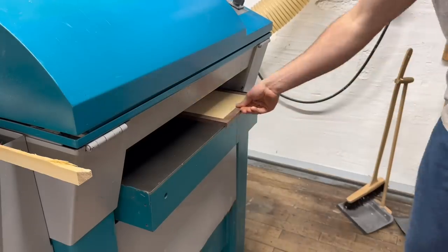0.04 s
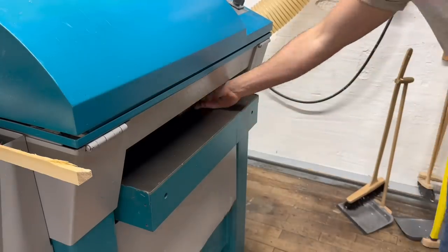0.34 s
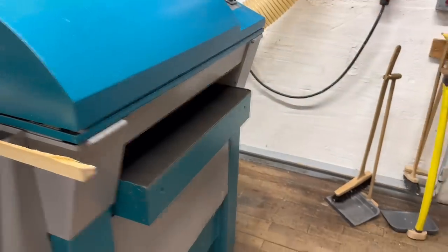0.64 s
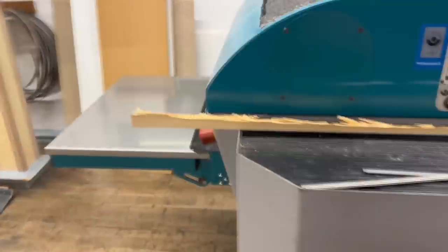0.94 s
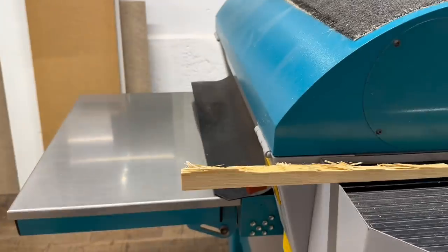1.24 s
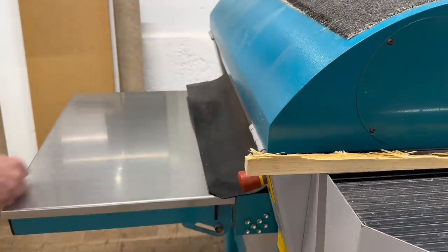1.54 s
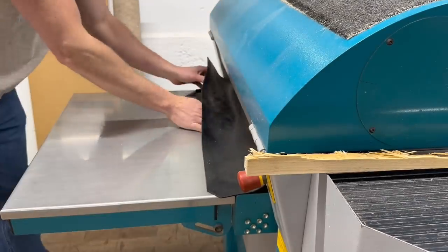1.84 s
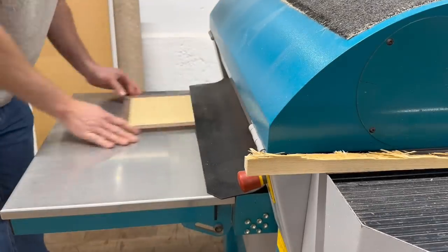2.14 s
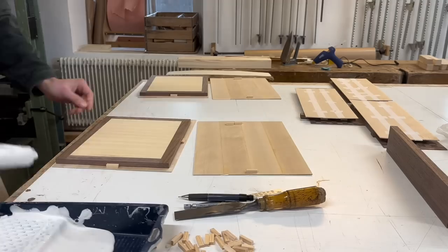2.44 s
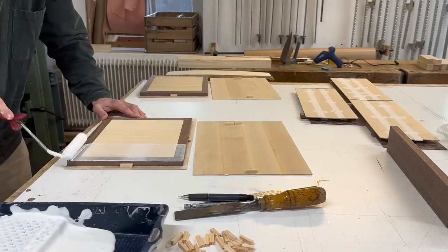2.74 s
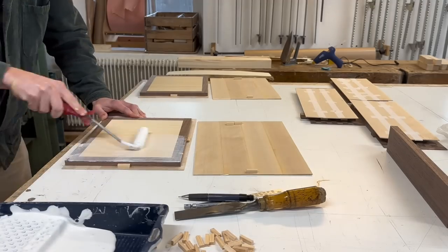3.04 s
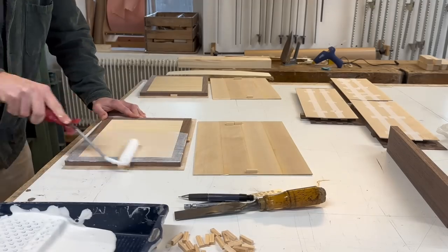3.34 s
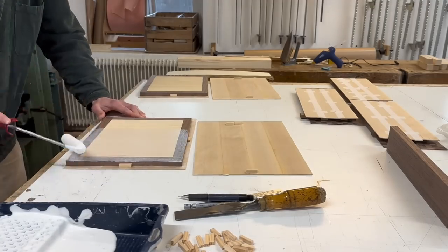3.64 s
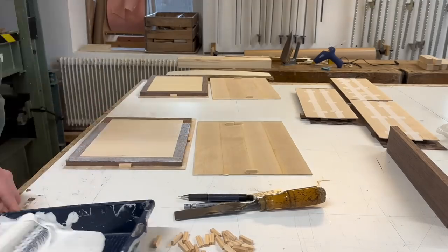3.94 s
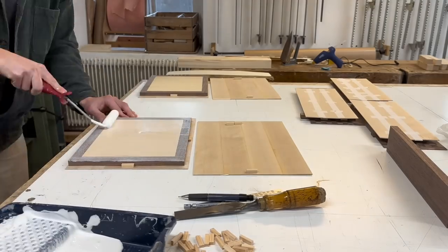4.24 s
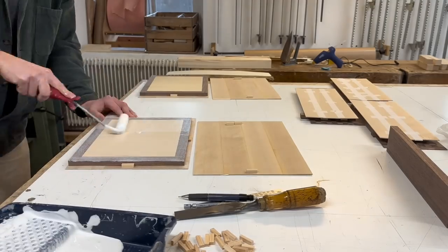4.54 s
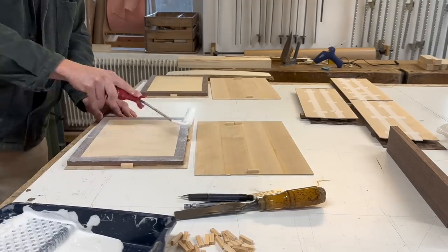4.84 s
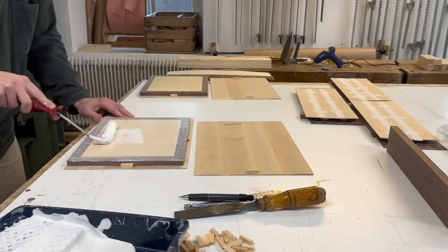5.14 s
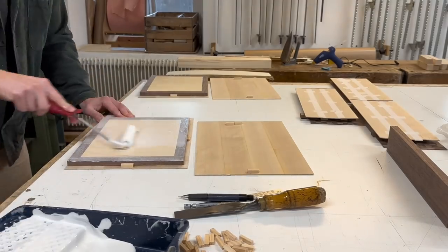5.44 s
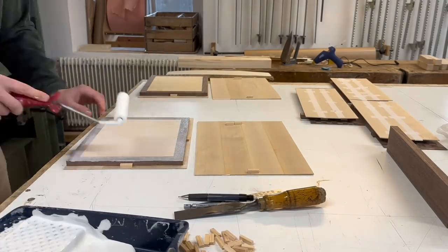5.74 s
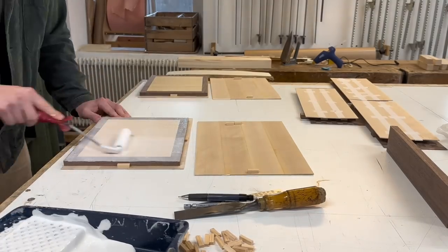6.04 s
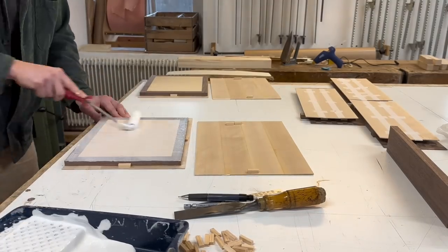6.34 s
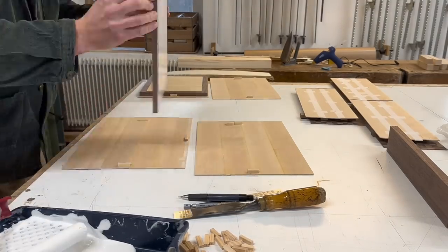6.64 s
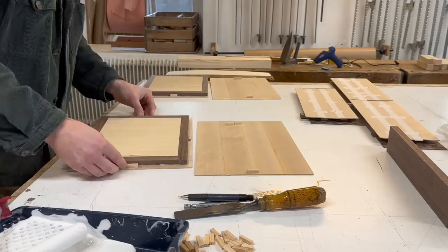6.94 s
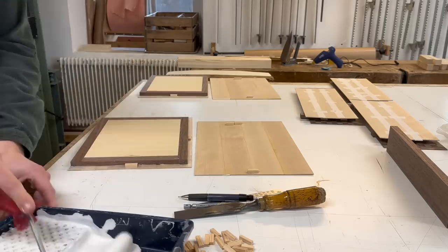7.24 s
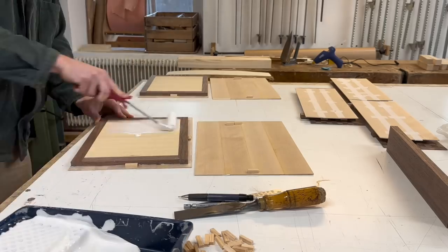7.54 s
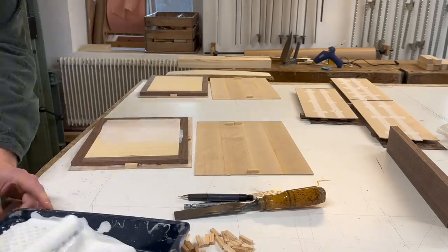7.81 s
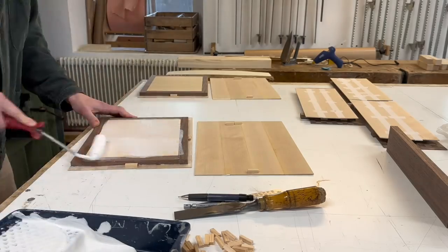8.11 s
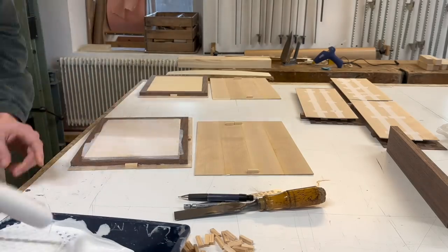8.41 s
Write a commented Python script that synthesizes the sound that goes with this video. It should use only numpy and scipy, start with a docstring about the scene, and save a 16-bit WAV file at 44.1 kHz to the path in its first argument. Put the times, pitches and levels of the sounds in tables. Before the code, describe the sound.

A loud planer whines over rushing air, then gives way to clicks, knocks and tacky roller strokes in a quiet workshop.

```python
"""A thickness planer whines over its roar of air and at once bites into a board, the knives adding a shrill,
stuttering ladder of partials. The board leaves, a few dull thuds sound like footsteps, and the planer's sound
breaks off abruptly. Quick bench work follows in a quiet shop, with faint chirps: a wooden frame clicks and
knocks on the table as a tacky glue roller makes one long pass, crackling with snapping threads. The roller
ticks over five ribs of its plastic tray, clacks, and goes on over the frame in short strokes."""
import sys
import numpy as np
from scipy import signal
from scipy.fft import rfft, irfft, next_fast_len
from scipy.io import wavfile
from scipy.ndimage import uniform_filter1d, map_coordinates

SR = 44100
rng = np.random.default_rng(int(sys.argv[2]) if len(sys.argv) > 2 else 0)


def waveform_to_disk(signal):
    """Save audio, clipped to [-1, 1], as 16-bit WAV at the path in sys.argv[1]."""
    frames = np.transpose(np.atleast_2d(signal))
    scaled = np.clip(frames, -1, 1) * 32767
    samples = np.round(scaled).astype(np.int16)
    wavfile.write(sys.argv[1], SR, samples)


N = 373527
TIME = np.arange(N) / SR
AGE = TIME[:SR // 5]   # seconds since a contact

# room tone of the shop: (frequency [Hz], relative density [dB])
SHOP_SPECTRUM = [(30, -62), (100, -42.5), (200, -27.5), (320, -23), (385, -6), (750, -4.5), (1100, -12),
                 (2650, -12), (3100, -18.5), (3500, -15), (7500, -23.5), (10200, -25.5), (16000, -33.5)]
# broad resonances of the shop: (frequency [Hz], width [Hz], boost [dB])
SHOP_RESONANCES = [(1250, 150, 3), (5620, 260, 3.5)]
# faint ventilation tones: (pitch [Hz], level [dB])
VENT_TONES = [(387.6, -68), (818, -71), (983, -70), (3330, -74), (3430, -69.5), (9981, -76)]
# stereo width at the bench: (frequency [Hz], side minus mid [dB])
BENCH_WIDTH = [(60, -5), (130, -12), (290, -27), (640, -23), (1410, -16.5), (3100, -4.5), (6820, 0.5),
               (15000, 1)]
# faint, short gliding chirps: (time [s], level [dB], pitch [Hz])
FAINT_CHIRPS = [(3.14, -61, 4550), (3.28, -59.5, 1710), (4.305, -63, 2210), (4.462, -51.5, 1560),
                (4.55, -56, 1600), (4.904, -63, 2640), (4.96, -64, 4550), (7.565, -56, 1275),
                (8.07, -62, 4950)]
# hollow rubbing of the wood: (time [s], level [dB])
RUB_LEVEL = [(2.55, -85), (2.63, -60), (2.9, -64), (3.15, -60), (3.28, -54), (3.33, -80)]
# modes of the frame on the table: (frequency [Hz], width [Hz], gain [dB])
FRAME_MODES = [(607, 80, 0.5), (860, 190, -5.5), (1235, 71, 2), (1594, 140, -0.5), (2567, 98, -7),
               (2800, 54, -2.5), (3560, 93, -12), (3890, 60, -6)]
# hard clicks of tool and frame: (time [s], level [dB], hardness [dB])
FRAME_CLICKS = [(2.301, -30, 10.5), (2.312, -34.5, 2), (2.3235, -27, 6.5), (2.33, -38, 11),
                (2.489, -40.5, 2), (4.474, -46, 3), (4.485, -33, 6), (5.911, -35.5, 8.5), (5.943, -39, 0.5),
                (6.244, -36, 0.5), (6.722, -31.5, -2.5), (6.8073, -31.5, -2.5), (7.853, -27.5, 7)]
# soft knocks of wood on the table: (time [s], level [dB], ring [Hz], relative snap [dB])
TABLE_KNOCKS = [(2.361, -34.5, 694, -12), (2.555, -38, 970, -11), (2.619, -37.5, 1160, -10),
                (3.108, -39, 1210, -11), (3.272, -43, 550, -9), (3.286, -44.5, 1500, -4),
                (4.4276, -35, 826, -18), (4.433, -35, 1000, -21), (4.661, -36.5, 980, -17),
                (4.724, -37, 1200, -13), (5.337, -41, 1180, -16), (5.398, -36.5, 1100, -13.5),
                (5.714, -37.5, 1140, -8), (6.827, -40, 1900, -13), (7.124, -38.5, 1160, -12),
                (7.173, -41, 730, -14), (7.649, -31, 646, -16), (7.76, -31, 680, -14.5),
                (7.81, -40, 1180, -7), (7.856, -31.5, 1510, -17), (7.967, -38, 720, -14)]
# modes of the plastic tray: (frequency [Hz], width [Hz], gain [dB])
TRAY_MODES = [(1240, 1600, -2), (3120, 1900, -3), (4160, 500, 5.5), (7160, 7500, -4), (12800, 19000, -19)]
# the tick on the tray's fifth rib, then clacks: (time [s], level [dB], ring [Hz])
TRAY_CLACKS = [(4.0142, -24, 4800), (4.019, -26.5, 3400), (4.139, -31, 4200), (4.1412, -18.5, 2550)]
# peeling glue: (frequency [Hz], relative density [dB])
CRACKLE_SPECTRUM = [(1300, -40), (2200, -9), (2750, -2.5), (3200, -3.5), (4300, -2), (8500, -5),
                    (14800, -8), (16000, -5.5)]
# travel of the roller in its long pass: (time [s], travel [turns])
PASS_TRAVEL = [(2.538, 0), (2.963, 19), (3.043, 22), (3.132, 26)]
# short strokes and one-turn dabs: (first turn [s], last turn [s], level [dB], relative crackle [dB])
ROLLER_STROKES = [(2.377, 2.443, -49, -4.5), (3.268, 3.268, -46.5, -0.5), (3.629, 3.629, -42, -7),
                  (4.091, 4.091, -48, 3), (4.564, 4.587, -48, -2.5), (5.577, 5.578, -44, -10),
                  (5.846, 5.846, -45.5, -4), (6.001, 6.039, -47, -3.5), (6.14, 6.209, -38.5, -8.5),
                  (6.273, 6.273, -41.5, -21), (6.766, 6.766, -47.5, -1), (6.841, 6.911, -38, -6.5),
                  (6.943, 7.004, -37.5, -6), (7.041, 7.072, -35.5, -5.5), (7.116, 7.137, -43, -5.5),
                  (7.595, 7.595, -40.5, -15), (7.692, 7.693, -44.5, -5.5), (7.791, 7.792, -37.5, -8.5),
                  (7.884, 7.952, -39, -9.5), (8.301, 8.301, -40.5, -7), (8.338, 8.378, -36, -8.5)]
# dull, low thuds, like footsteps or handling bumps: (time [s], level [dB], ring [Hz])
DULL_THUDS = [(0.966, -34.5, 533), (1.034, -30.5, 874), (1.063, -31, 560), (1.084, -33.5, 520),
              (1.113, -30, 530), (1.143, -33, 476)]
# resonances of the planer's hood: (frequency [Hz], width [Hz], gain [dB])
HOOD_MODES = [(509.5, 88, 8), (681, 24, 11.5), (1045, 99, 7), (1203, 32, 7.5)]
# stereo width of the planer's air: (frequency [Hz], side minus mid [dB])
PLANER_WIDTH = [(60, -13), (130, -42), (290, -21), (640, -20), (1410, -10), (3100, -2.5), (6820, -1.5),
                (15000, -12)]
# air dragged round by the cutter block: (time [s], roar level [dB], hiss level [dB])
AIR_LEVELS = [(0.02, -37.5, -52), (0.4, -40, -52.5), (0.83, -39.5, -57.5), (1.32, -37.5, -54.5),
              (2.13, -37, -52), (2.27, -36, -52.5)]
# low roar of that air: (frequency [Hz], relative density [dB])
ROAR_SPECTRUM = [(30, -69), (85, -50), (150, -28), (230, -15), (340, -11), (440, -7.5), (510, -2.5),
                 (740, -7), (1100, -8.5), (1400, -13), (2600, -18.5), (3100, -23), (4500, -42)]
# its bright hiss: (frequency [Hz], relative density [dB])
HISS_SPECTRUM = [(1180, -33), (2000, -6), (2910, -9), (3550, -9.5), (5210, -7), (13600, -16), (16000, -17)]
# steady tones of drive and extractor: (pitch [Hz], level [dB])
DRIVE_TONES = [(511.4, -61), (1316, -50.5), (2837, -60.5), (2908, -53.5), (13480, -68), (13610, -68)]
# whine of the cutter block: (time [s], pitch [Hz])
WHINE_PITCH = [(0, 1709.3), (0.2, 1708.1), (0.65, 1708.0), (1.15, 1710.2), (2.3, 1710.5)]
# swell and dip of the whine: (time [s], level [dB])
WHINE_LEVEL = [(0.02, -33.5), (0.43, -35), (0.7, -38), (0.775, -57), (0.835, -44), (0.92, -43), (1.17, -38),
               (1.64, -37.5), (1.8, -39), (2.27, -37.5)]
# partials of the cut: (multiple of half the whine pitch, level [dB])
CUT_PARTIALS = [(3, -55), (8, -46), (9, -53.5), (10, -37), (11, -52), (12, -46), (13, -51.5), (14, -43),
                (15, -54.5), (18, -42.5)]
# stutters in the shriek of the cut: (time [s])
SHRIEK_BREAKS = [.205, .346, .42, .487, .508, .562, .643]

ENTER_S, LEAVE_S, STOP_S = 0.11, 0.655, 2.289   # board enters, board leaves, the planer's sound breaks off


def from_db(db):
    """Decibels to gain."""
    return 10 ** (np.asarray(db) / 20)


def rms_one(x):
    """Scale to unit rms."""
    return x / np.sqrt(np.mean(x ** 2) + 1e-20)


def peak_one(x):
    """Scale so that the loudest few milliseconds have unit rms."""
    return x / np.sqrt(uniform_filter1d(np.mean(x ** 2, axis=0), size=200).max() + 1e-20)


def in_time(rows):
    """The columns of an automation curve at every sample."""
    s, *columns = np.transpose(rows)
    return [np.interp(TIME, s, c) for c in columns]


def bump(s, width_s):
    """A bell of height 1 round time s."""
    return np.exp(-((TIME - s) / width_s) ** 2)


def pan(db):
    """Gains of the two ears; positive is left."""
    return from_db(db / 2 * np.array([[1], [-1]]))


def drift(rate):
    """Random modulation of spread 1, changing about rate times a second."""
    knots = rng.standard_normal(4096)
    return map_coordinates(knots, [TIME * rate], order=1, mode="wrap") * np.sqrt(3 / 2)


def colour(x, spectrum, peaks=()):
    """EQ a sound with a smooth curve over log frequency, plus resonance peaks."""
    size = next_fast_len(x.shape[-1])
    hz = np.arange(size // 2 + 1) * SR / size
    curve_hz, curve_db = np.transpose(spectrum)
    db = np.interp(np.log(np.maximum(hz, 1)), np.log(curve_hz), curve_db)
    db += sum(boost / (1 + (2 * (hz - centre) / width) ** 2) for centre, width, boost in peaks)
    return irfft(rfft(x, size) * from_db(db), size)[..., :x.shape[-1]]


def diffuse(width):
    """Stereo noise: a white mid plus a side coloured by the width curve."""
    mid, side = rng.standard_normal((2, N))
    return mid + colour(side, width) * np.array([[1], [-1]])


def band(x, low_hz, high_hz):
    """Gentle band-pass."""
    return signal.sosfilt(signal.butter(2, [low_hz, high_hz], "band", fs=SR, output="sos"), x)


def resonate(x, modes):
    """Parallel resonances with alternating signs."""
    out = 0
    for k, (hz, width, db) in enumerate(modes):
        out = out + (-1) ** k * from_db(db) * signal.lfilter(*signal.iirpeak(hz, hz / width, fs=SR), x)
    return out


def add(track, s, sound):
    """Mix a short sound in at time s."""
    i = int(s * SR)
    track[:, i:i + sound.shape[1]] += sound[:, :N - i]


def tone(cycles, rough, rate, wander_db, apart=0.24):
    """A stereo tone: turbulence frays it, standing waves swell it and shift it between the ears."""
    angle = 2 * np.pi * cycles + apart * np.sqrt(2) * np.tanh(drift(2.5)) * np.array([[1], [-1]])
    frayed = np.sin(angle) * (1 + rough * drift(rate)) + np.cos(angle) * rough * drift(rate)
    return np.sqrt(2 / (1 + 2 * rough ** 2)) * frayed * from_db(wander_db * drift(10))


def contact(scatter, s, t60, direct):
    """A blow: one direct click, then dense reflections that die away."""
    blow = np.roll(scatter, -int(s * SR), axis=1)[:, :len(AGE)] * from_db(-60 * AGE / t60)
    blow[:, 0] += direct
    return blow


def frame_at_spot(spread_db=2.5):
    """The modes of the frame, each as strong as the touched spot makes it."""
    return [(hz, width, db + spread_db * rng.standard_normal()) for hz, width, db in FRAME_MODES]


def shop(air_db=-55.5):
    """The bed: soft room tone with faint, wavering ventilation tones."""
    air = from_db(air_db) * rms_one(colour(diffuse(BENCH_WIDTH), SHOP_SPECTRUM, SHOP_RESONANCES))
    vent = sum(from_db(db - 1) * tone(hz * TIME, rough=0.5, rate=22, wander_db=1.14)
               for hz, db in VENT_TONES)
    return air + vent


def chirps(count=50, faint_db=-69.5, centre_hz=4600, spread_octaves=.22, length_s=0.046):
    """Faint, short chirps, frayed and gliding: a few placed ones, and fainter high ones at random."""
    out, fray = np.zeros((2, N)), 1.1 * drift(600)
    strays = [(rng.uniform(STOP_S, TIME[-1]), faint_db,
               centre_hz * 2 ** (spread_octaves * rng.standard_normal())) for _ in range(count)]
    along = np.clip(AGE / length_s, 0, 1)
    for s, db, start_hz in FAINT_CHIRPS + strays:
        hz = start_hz * (1 + rng.uniform(-.04, .0192) * along)
        wave = np.sin(2 * np.pi * np.cumsum(hz) / SR + np.roll(fray, int(s * SR))[:len(AGE)])
        add(out, s, (2 * from_db(db) * np.sin(np.pi * along) * wave)[None])
    return out


def spatter(per_s=11, spread_db=4):
    """Lone glue threads snap with tiny bright ticks."""
    snaps = (rng.random(N) < per_s / SR) & (TIME > STOP_S)
    sizes = from_db(-45 + spread_db * np.clip(rng.standard_normal((2, N)), -2, 2))
    return band(snaps * sizes, 4500, 14000)


def rubbing(hum_hz=555, width_hz=47):
    """The wood hums hollowly while the roller is dragged along it."""
    level_db, = in_time(RUB_LEVEL)
    mode = [(hum_hz, width_hz, 0)]
    hum = rms_one(resonate(resonate(rng.standard_normal(N), mode), mode))
    return from_db(level_db) * (TIME > STOP_S) * hum


def clicks(scatter):
    """Hard contacts ring the frame under a snap and a crack; the harder, the shorter and brighter."""
    out = np.zeros((2, N))
    for s, db, hard_db in FRAME_CLICKS:
        t60 = 0.071 * from_db(-0.26 * hard_db)
        body = resonate(contact(scatter, s, t60 * 1.1, direct=2.4), FRAME_MODES)
        snap = band(contact(scatter, s, t60, direct=4.1 * from_db(.6 * hard_db)), 1650, 8070)
        crack = band(contact(scatter, s, t60 * 0.81, direct=5.3 * from_db(0.78 * hard_db)), 5480, 13400)
        add(out, s, from_db(db - hard_db - 9) * peak_one(body) + from_db(db - 3) * peak_one(snap))
        add(out, s, from_db(db + hard_db - 4) * peak_one(crack) * pan(db=1.5))
    return out


def knocks(scatter):
    """Dry taps on the table: the struck spot sets the pitch of a tock; the frame's low modes answer."""
    out = np.zeros((2, N))
    for s, db, ring_hz, snap_db in TABLE_KNOCKS:
        blow = contact(scatter, s, t60=0.059, direct=7.6)
        body = peak_one(band(resonate(blow, frame_at_spot()[:4]) + 0.47 * blow, .7 * ring_hz, 2170))
        ring = resonate(contact(scatter, s, t60=0.045, direct=36), [(ring_hz, 220, 0)])
        tock = peak_one(band(ring, ring_hz / 2, 3100))
        snap = peak_one(band(blow, 1800, 10800))
        add(out, s, from_db(db - 10) * body + from_db(db - 7.5) * tock + from_db(db + snap_db) * snap)
    return out


def tray(scatter, first_s=3.9, gap_s=.0284, rise_db=5.5, rib_hz=4770, spot_q=4.7):
    """Five quick ticks on the tray's ribs, then clacks; the tray rattles and the struck spot rings."""
    out = np.zeros((2, N))
    first_ribs = [(first_s + k * gap_s, -38.5 + k * rise_db, rib_hz) for k in range(4)]
    for s, db, ring_hz in first_ribs + TRAY_CLACKS:
        blow = band(contact(scatter, s, t60=0.066, direct=1.2), 500, 18000)
        shell = peak_one(resonate(blow, TRAY_MODES))
        spot = [(ring_hz, ring_hz / spot_q, 0)]
        ring = peak_one(resonate(resonate(contact(scatter, s, t60=0.032, direct=11), spot), spot))
        add(out, s, from_db(db - 12) * shell + from_db(db - 9.5) * ring)
    return out


def long_pass(end_s=3.12, rise_db_per_s=25, fall_db_per_s=600, slap_depth_db=16):
    """Body and crackle envelopes of the long pass: the sleeve slaps once a turn, harder and harder."""
    t = TIME - end_s
    db = -47.5 + np.minimum(rise_db_per_s * t, -fall_db_per_s * t)
    turns, = in_time(PASS_TRAVEL)
    slap_db = slap_depth_db * (.5 - turns % 1) * (turns > 0)
    return from_db([db - 3 + slap_db, db + 0.7 * slap_db]) * (TIME > STOP_S)


def roller(scatter, turn_s=.035, attack_s=0.0076, grain_db=2.2, grains_per_s=2200):
    """Glue threads snap in dense grains, one rasp a turn; the frame answers differently at each spot."""
    grains = scatter * from_db(grain_db * drift(grains_per_s))
    swell = (AGE / attack_s * np.exp(1 - AGE / attack_s))[None] ** 1.25
    body_gain, crackle_gain = long_pass()
    body = body_gain * rms_one(resonate(grains, FRAME_MODES))
    for first_s, last_s, db, crackle_db in ROLLER_STROKES:
        turn_count = round((last_s - first_s) / turn_s) + 1
        for k, s in enumerate(np.linspace(first_s, last_s, turn_count)):
            turn_db = db - (k == 0) + .7 * rng.standard_normal()   # a stroke starts 1 dB lighter
            here = grains.take(int(s * SR) + np.arange(len(AGE)), axis=1, mode="wrap")
            add(body, s - .002, from_db(turn_db - 7) * swell * rms_one(resonate(here, frame_at_spot())))
            add(crackle_gain[None], s - .002, from_db(turn_db + crackle_db + 3.5) * swell)
    top_ring = resonate(grains, FRAME_MODES[4:])
    return body + crackle_gain * rms_one(colour(grains, CRACKLE_SPECTRUM) + top_ring)


def thuds(scatter):
    """A few dull, low thuds, like footsteps or handling bumps, each a boom with its own woody pitch."""
    out = np.zeros((2, N))
    for s, db, ring_hz in DULL_THUDS:
        blow = band(contact(scatter, s, t60=0.17, direct=3), 160, 3000)
        boom = peak_one(band(3 * blow + resonate(blow, HOOD_MODES), 280, 1080))
        ring = peak_one(resonate(contact(scatter, s, t60=0.068, direct=23), [(ring_hz, 45, 0)]))
        add(out, s, from_db(db - 3) * boom + from_db(db - 1.5) * band(ring, 310, 1400))
    return out


def drive():
    """Drive and extractor hold steady tones; the high ones open up after the cut."""
    opening = np.interp(TIME, [.8, 1.1], [.3, 1])
    return sum(from_db(db) * (opening if hz > 2000 else 1)
               * tone(hz * TIME, rough=0.2, rate=35, wander_db=1.5) for hz, db in DRIVE_TONES)


def air_rush(surge_db):
    """Air dragged round by the block roars in the hood, with a hiss on top."""
    roar_db, hiss_db = in_time(AIR_LEVELS)
    roar = rms_one(colour(diffuse(PLANER_WIDTH), ROAR_SPECTRUM, HOOD_MODES))
    hiss = rms_one(colour(diffuse(PLANER_WIDTH), HISS_SPECTRUM))
    return from_db(roar_db + .5 + .84 * surge_db) * roar + from_db(hiss_db + 9.5 + .5 * surge_db) * hiss


def bite(attack_db_per_s=550, ease_db_per_s=4, release_db_per_s=750):
    """Envelope of the cut in dB: it builds as the board enters, eases along it and dies as it leaves."""
    before, after = np.maximum(ENTER_S - TIME, 0), np.maximum(TIME - LEAVE_S, 0)
    return -1 - attack_db_per_s * before - ease_db_per_s * (TIME - ENTER_S) - release_db_per_s * after


def chips(cycles, knife_count=4):
    """Unequal knives leave a fine ladder of high partials; torn chips rasp once a turn of the block."""
    angle = 2 * np.pi * cycles / knife_count
    ladder = sum(np.sin(k * angle + rng.uniform(0, 2 * np.pi)) * rng.rayleigh() for k in range(22, 37))
    rasp = rms_one(band(rng.standard_normal((2, N)), 4000, 12500) * (1 + np.cos(angle)))
    return from_db(-62.5) * ladder + from_db(-50) * rasp


def cut(cycles, bite_db, surge_db, fade_db_per_s=5):
    """Unequal knives strike the wood: partials on and between the whine's, and a stuttering shriek."""
    ladder = sum(from_db(db) * tone(k * cycles / 2, rough=0.13, rate=130, wander_db=2.5)
                 for k, db in CUT_PARTIALS)
    flare_db = 10 * (bump(ENTER_S, .018) + bump(LEAVE_S, .018))   # the board's ends tear harder
    tearing = from_db(flare_db) * chips(cycles)
    stutter_db = 19 * sum(bump(s, width_s=0.009) for s in SHRIEK_BREAKS)
    shriek_db = -39 + surge_db - fade_db_per_s * (TIME - ENTER_S) - stutter_db
    shriek = from_db(shriek_db) * tone(3 * cycles, rough=.12, rate=120, wander_db=.6)
    return from_db(bite_db) * (ladder + tearing + shriek)


def whine(cycles, bite_db, surge_db):
    """The block sings like a siren in three partials; the octave gains edge in the wood."""
    level_db = in_time(WHINE_LEVEL)[0] + 1.5
    dip_db = 14 * bump(0.28, width_s=0.06)   # the octave sinks briefly
    sharpen_db = 2 * np.maximum(TIME - 1, 0)   # and grows towards the end
    octave_db = level_db - 11.5 + 3.5 * from_db(bite_db) + surge_db - dip_db + sharpen_db
    root = from_db(level_db) * tone(cycles, rough=0.032, rate=150, wander_db=-0.3, apart=0.25)
    octave = from_db(octave_db) * tone(2 * cycles, rough=0.17, rate=150, wander_db=1)
    twelfth = from_db(level_db - 21) * tone(3 * cycles, rough=0.2, rate=160, wander_db=1.5)
    return root + pan(db=3.5) * octave + twelfth


def planer():
    """Whine and cut, locked to the spinning block, ride on drive and air until all break off."""
    pitch_hz, = in_time(WHINE_PITCH)
    cycles = np.cumsum(pitch_hz) / SR
    bite_db = bite()
    surge_db = 4.5 * bump(0.158, width_s=0.024)   # a swell as the front edge is drawn in
    knives = whine(cycles, bite_db, surge_db) + pan(db=2.5) * cut(cycles, bite_db, surge_db)
    gate = np.clip((STOP_S - TIME) / .004 + .5, 0, 1)
    return gate * (knives + drive() + air_rush(surge_db))


def scene():
    """Planer, then bench work, both a touch left over the room tone; the light frame gives no bass."""
    scatter = diffuse(BENCH_WIDTH)
    contacts = clicks(scatter) + knocks(scatter) + tray(scatter)
    bench = contacts + roller(scatter) + rubbing() + chirps() + spatter()
    bench = signal.sosfilt(signal.butter(2, 240, "high", fs=SR, output="sos"), bench)
    return (planer() + thuds(scatter) + bench) * pan(db=0.5) + shop()


def record(dry):
    """A steep low-pass takes off the very top."""
    return signal.sosfilt(signal.ellip(12, .1, 80, 15750, fs=SR, output="sos"), dry)


dry = scene()
out = record(dry)
waveform_to_disk(out)
```